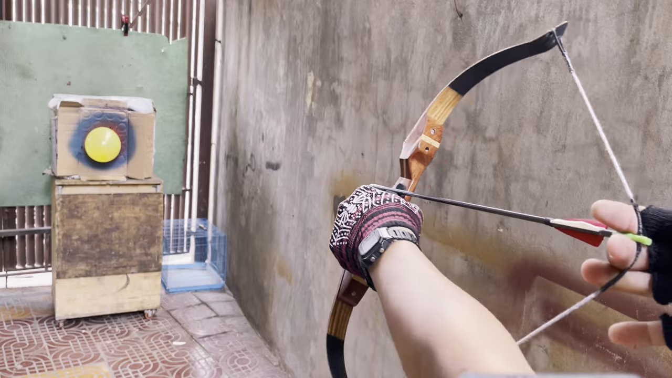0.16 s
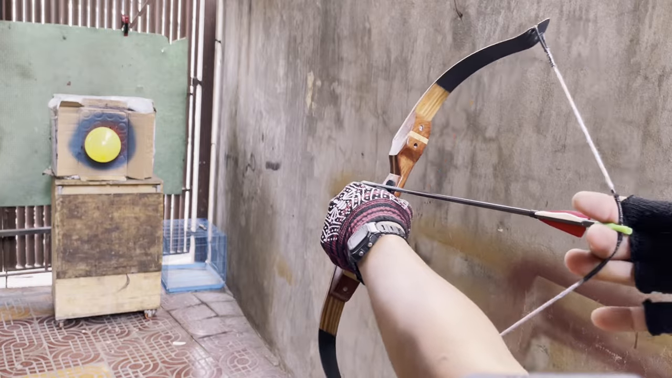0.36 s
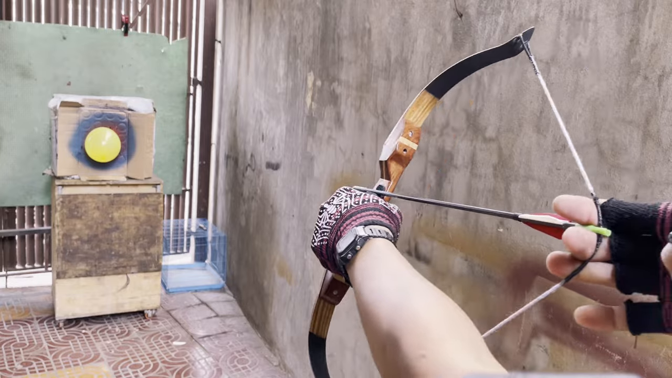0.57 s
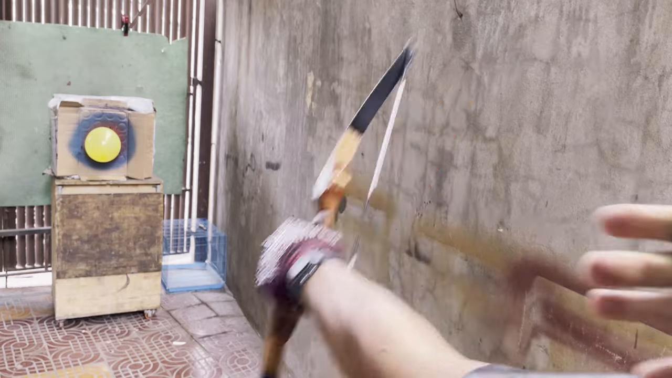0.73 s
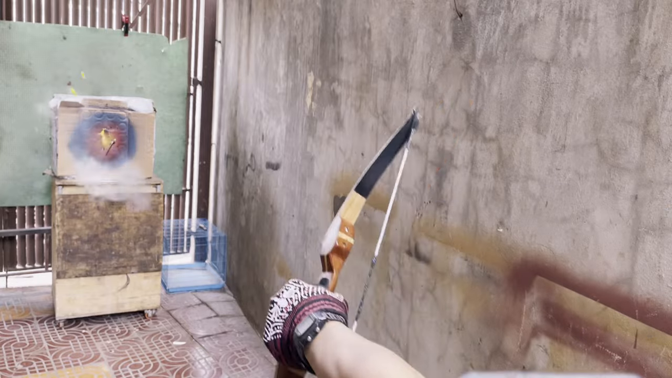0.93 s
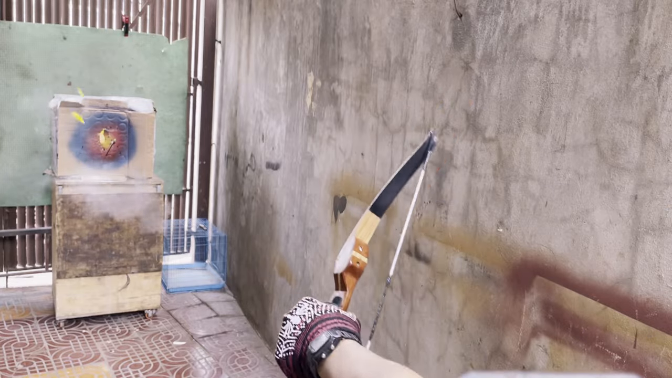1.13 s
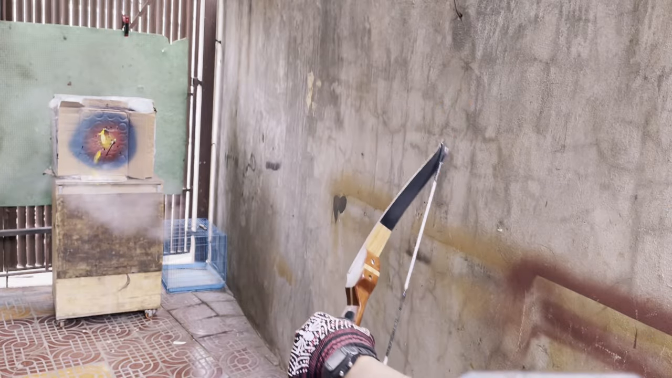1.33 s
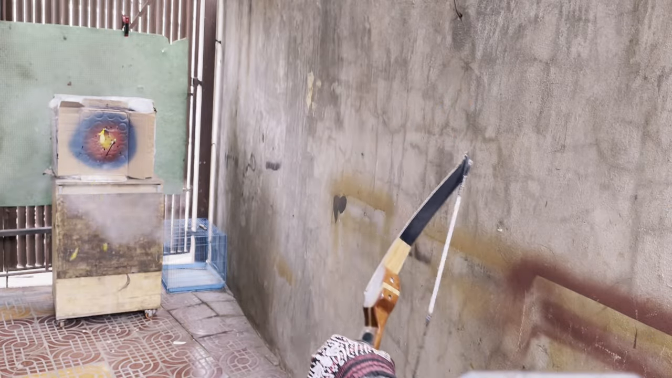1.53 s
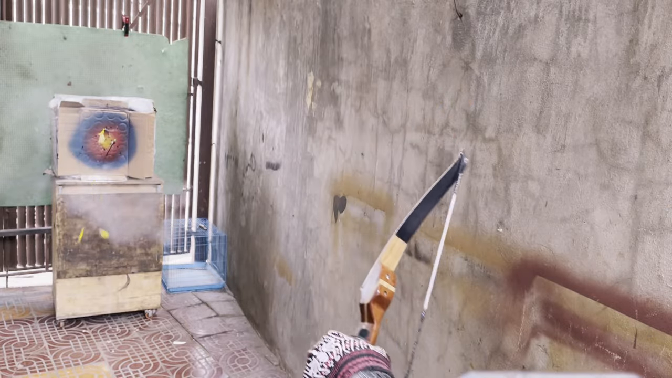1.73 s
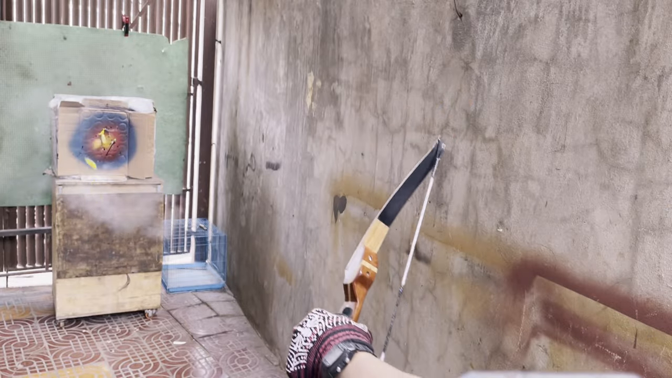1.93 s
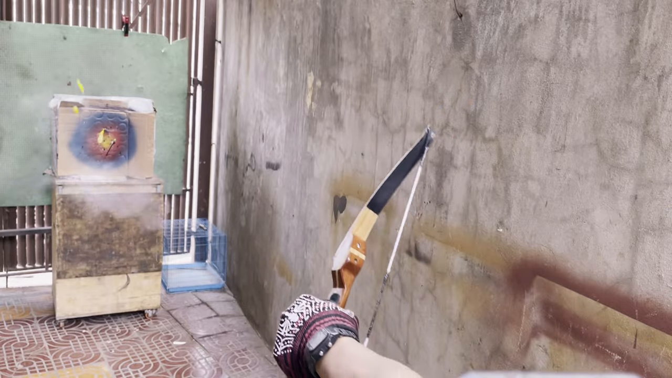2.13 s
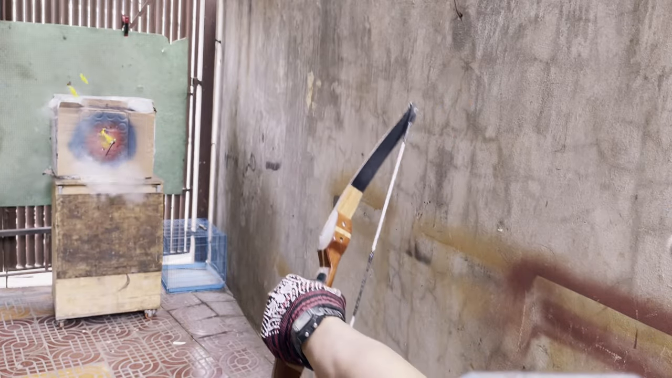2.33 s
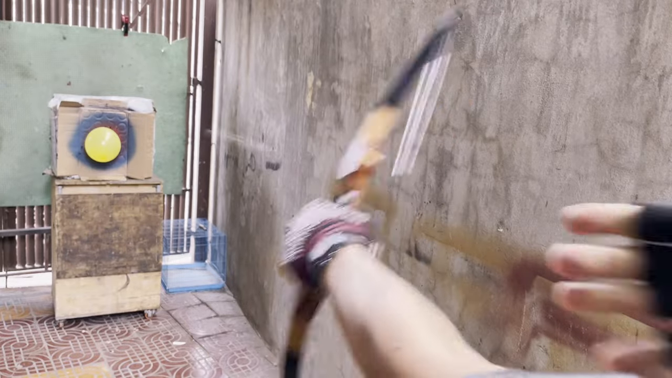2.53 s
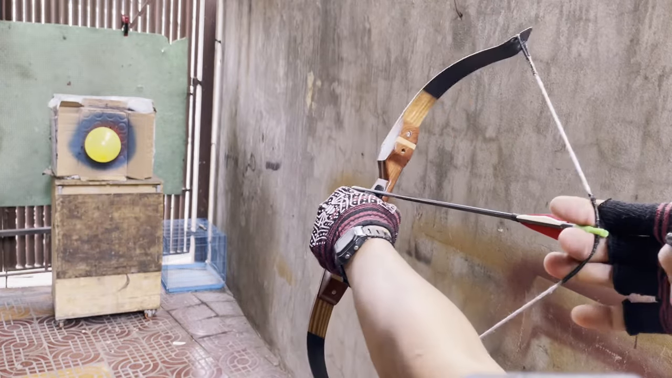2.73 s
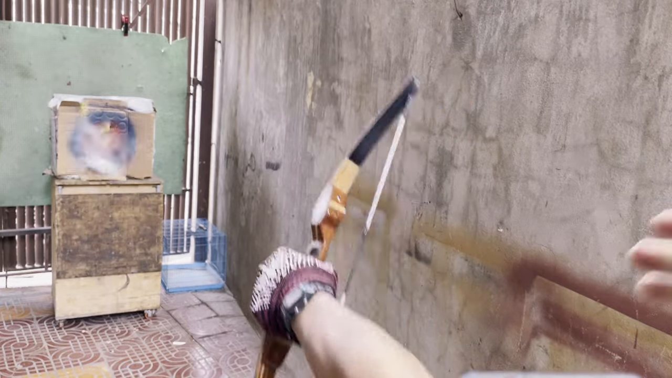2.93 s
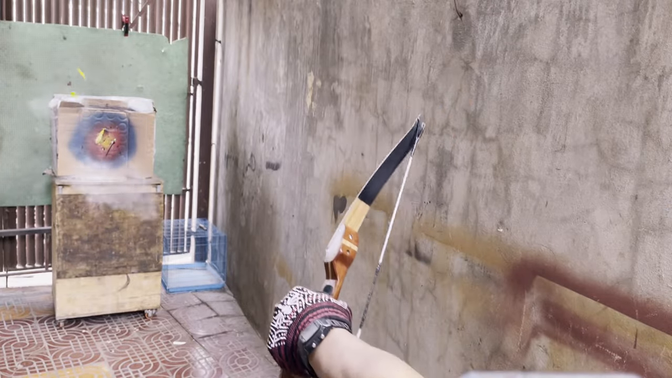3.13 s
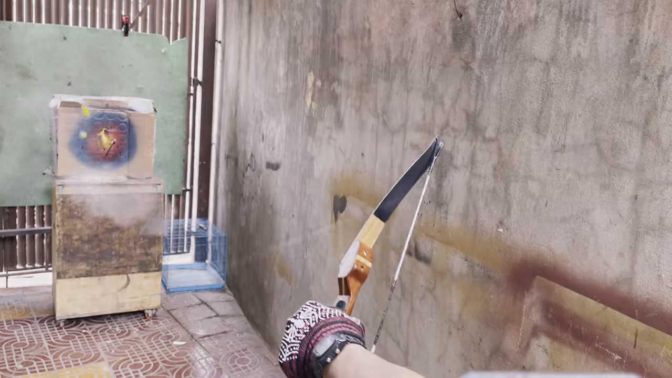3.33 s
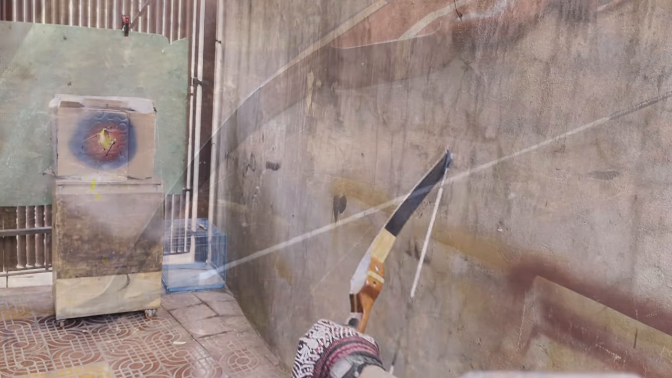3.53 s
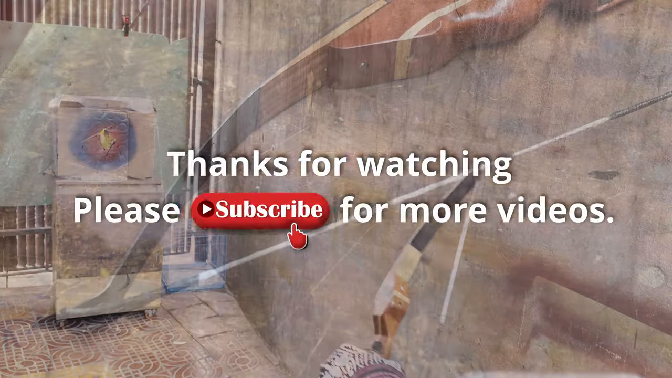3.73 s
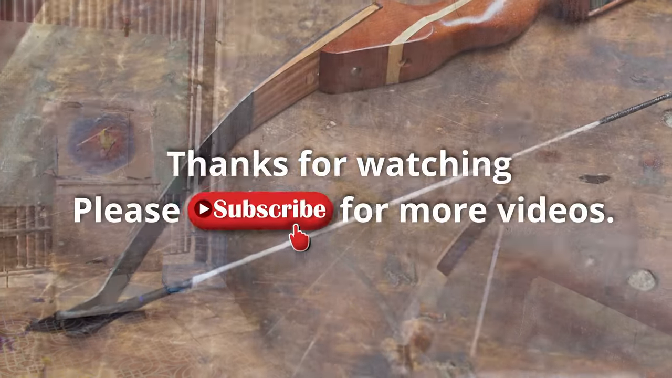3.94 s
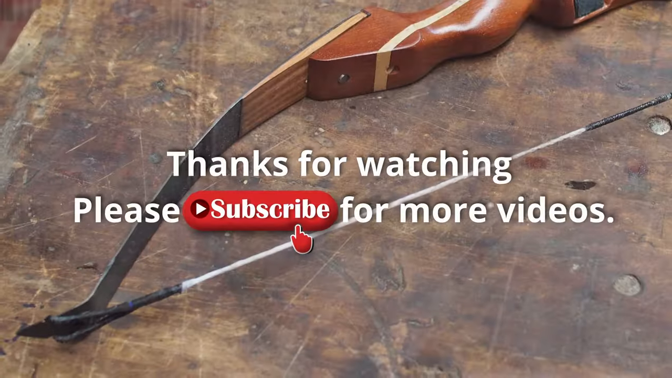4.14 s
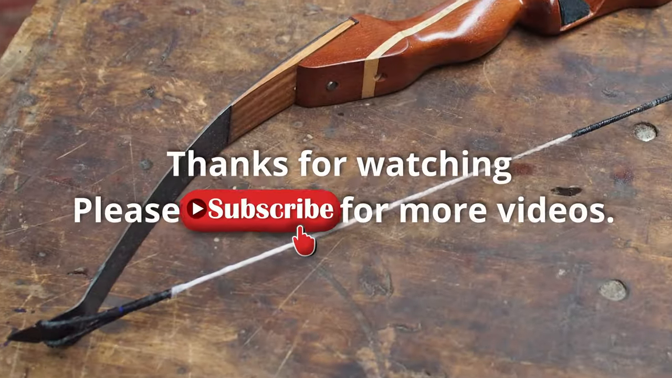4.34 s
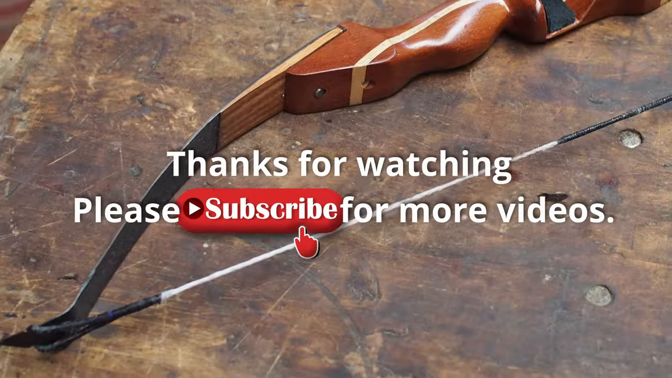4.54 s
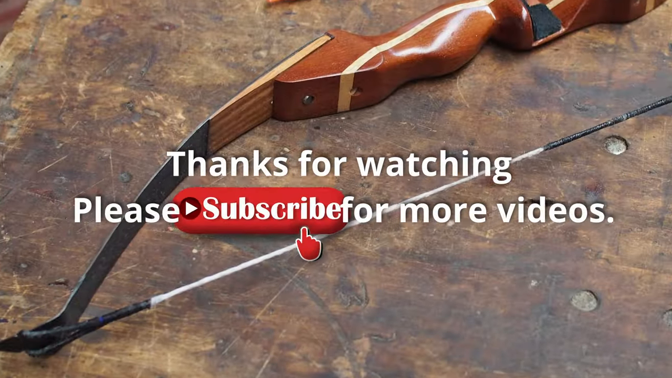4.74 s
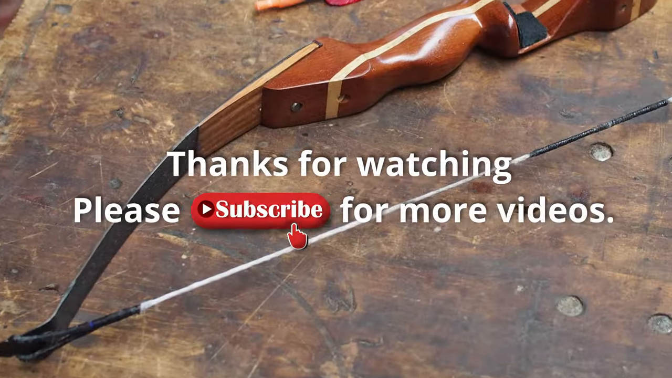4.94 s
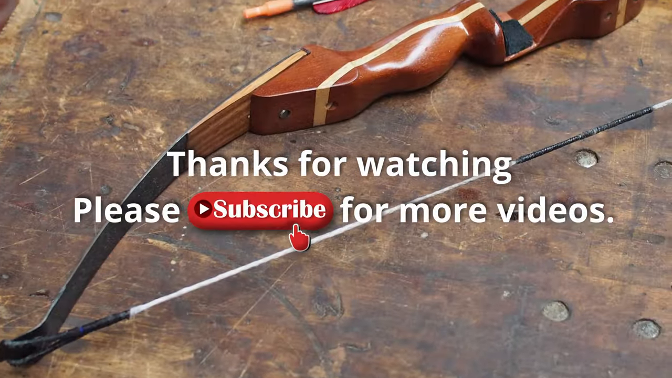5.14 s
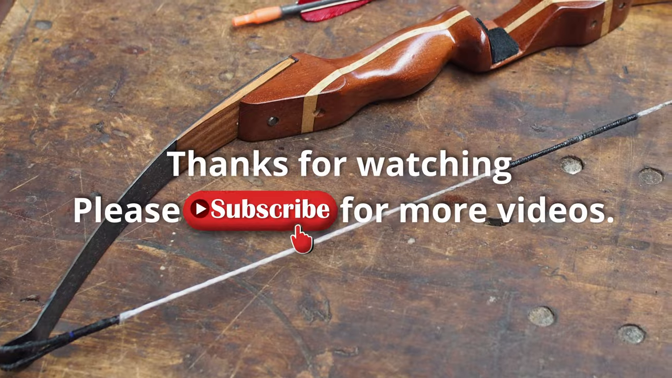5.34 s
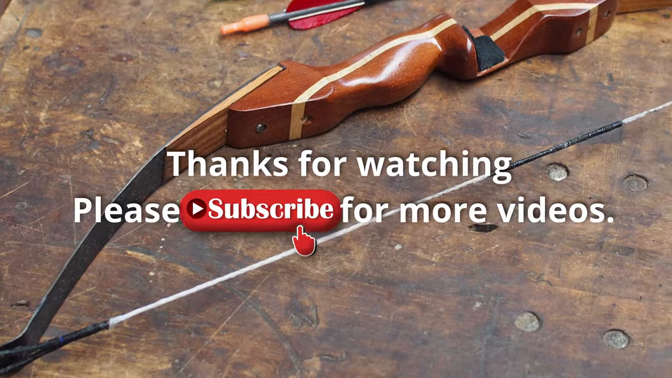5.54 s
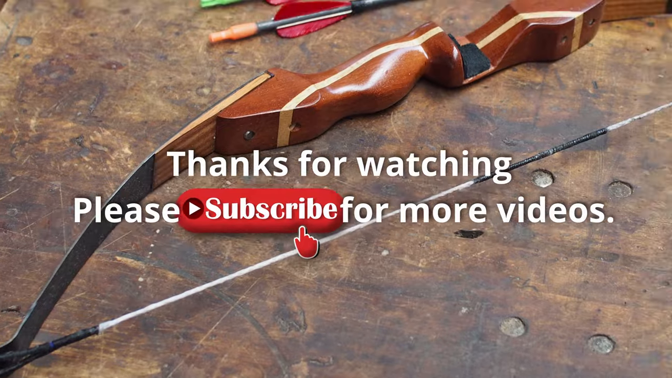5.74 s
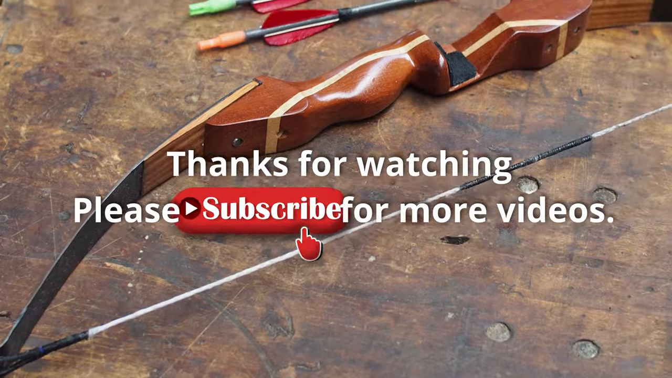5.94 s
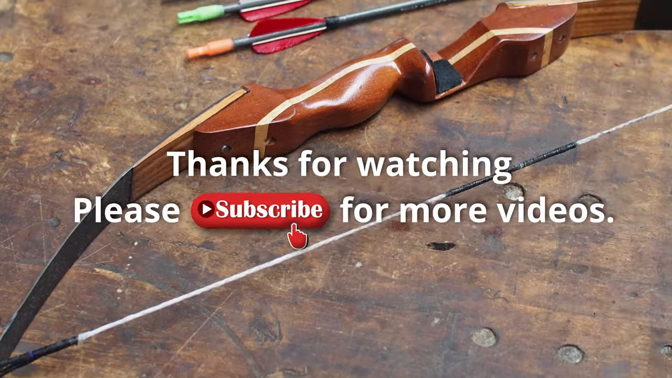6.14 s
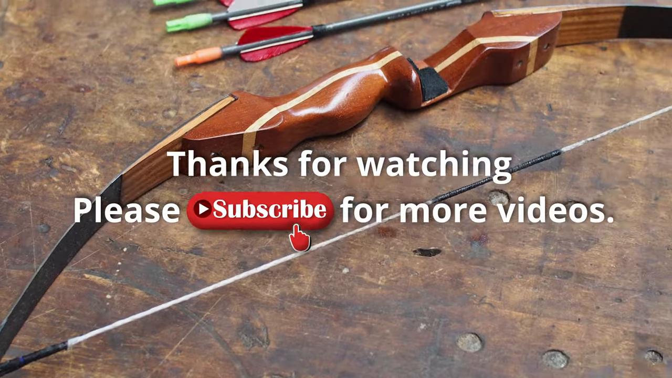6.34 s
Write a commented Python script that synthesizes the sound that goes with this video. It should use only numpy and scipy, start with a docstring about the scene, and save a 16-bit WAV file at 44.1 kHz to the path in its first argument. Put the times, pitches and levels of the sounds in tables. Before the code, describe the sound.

Close in a walled outdoor yard with an engine idling low, a bow string snaps and an arrow hits a tenth of a second later: sharp pop, tearing crack, boxy thud, crackling scraps and a reverberant tail. The sound then runs backwards, swelling into the hit and snap, and the shot repeats forwards. An abrupt cut leaves quiet distant traffic, faint motor tones, light clicks and scuffs.

```python
"""A small recurve bow is shot in a walled yard: string noise bursts and decaying limb and shaft modes,
the arrow's whirr, then the pop and crack of a burst ball and the modal thud of a box.
An engine idles nearby as a sum of harmonics of its firing rate, over coloured-noise air.
The shot plays forwards, backwards and forwards again, then the scene cuts to distant traffic, made of
noise and engine tones, with a few light clicks and scuffs as short noise bursts."""
import sys
import numpy as np
from scipy import signal
from scipy.fft import rfft, irfft, next_fast_len
from scipy.io import wavfile
from scipy.ndimage import uniform_filter1d, minimum_filter1d, map_coordinates

SR = 44100
rng = np.random.default_rng(int(sys.argv[2]) if len(sys.argv) > 2 else 0)


def transcribe(u):
    """Save the signal u as a 16-bit wav file named by the first command-line argument.

    u: samples, shape (n,) or (channels, n), limited to [-1, 1]; the rate is SR.
    q: integer samples, one column per channel.
    """
    v = np.clip(np.atleast_2d(u).T, -1, 1)
    q = np.round(v * 32767).astype(np.int16)
    wavfile.write(sys.argv[1], SR, q)


N = 285768
TIME = np.arange(N) / SR  # seconds
HALF_S = SR // 2  # samples in half a second

# Times at which the shot turns backwards, turns forwards again and yields to the street; the hit.
REWIND_S, REPLAY_S, CUT_S = 1.66862, 2.73636, 3.815
HIT_S = 0.8142

# Stereo likeness of the spread sounds. Each row: frequency in Hz, likeness, limited to -0.9 to 0.995 in use.
WIDE = [(120, 0.82), (400, 0.5), (1200, -0.13), (4000, 0.6), (7200, 0.27), (7700, -1.7), (8900, -1.1),
        (9400, 0.042), (11500, 1), (14500, -1.3)]
# Stereo likeness of the nearer sounds. Each row: frequency in Hz, likeness, limited to -0.9 to 0.995 in use.
NEAR = [(150, 0.99), (450, 0.5), (950, .7), (1900, 0.58), (4000, 0.82), (7000, 0.33), (8300, -1.4),
        (9600, 0.25), (11500, 0.41), (15000, -0.89)]
# Colour difference of the two channels. Each row: frequency in Hz, left minus right in dB.
LEAN = [(100, -1), (300, -1.8), (1200, 1.2), (3500, 2.4), (9000, -.2)]
TOP_HZ = 16600
# Reverberation of the yard. Each row: frequency in Hz, decay time T60 in seconds.
YARD_T60 = [(100, 0.46), (400, 0.81), (2000, 0.52), (6000, 0.44), (14000, 0.33)]

# Air in the yard. Each row: frequency in Hz, relative density in dB per Hz.
YARD_AIR = [(25, -25), (45, -8), (100, -6), (170, -13.5), (250, -12.5), (320, -15.5), (450, -15),
            (750, -17.5), (1050, -17.5), (2000, -24.5), (4000, -32.5), (7000, -36.5), (11000, -43),
            (15000, -50)]
YARD_AIR_DB, OPENING_DB, OPENING_S = -35.5, -5.5, 0.4  # air and engine come up from OPENING_DB at the start
# Firing rate of the idling engine. Each row: time in seconds, mean firings per second.
IDLE = [(0.0, 19.3), (0.8, 19.3), (1.4, 19.15), (3.8, 18.3)]
# Exhaust harmonics. Each row: order of the firing rate, mean level at the start in dB, drift in dB per second.
EXHAUST = [(2, -51, -7.5), (3, -51.5, 8.5), (4, -42, 5), (5, -39, -7), (6, -55, 13.5), (7, -43, -2),
           (9, -53.5, -2.5), (13, -48, -6.5)]
SETTLED_S = 1.156  # the drift of level ends here
LINGER_DB, LINGER_END_S, LINGER_FADE_S = -4, 4.51, 0.31  # the engine after the cut

# Traffic wash. Each row: time in seconds, level in dB, of which only the swing about its mean is used.
STREET_LEVEL = [(3.83, -44.5), (3.94, -46.5), (5.45, -47), (5.85, -50.5), (6.48, -51.5)]
# Rumble of the traffic. Each row: frequency in Hz, relative density in dB per Hz.
TRAFFIC = [(15, -46), (25, -22), (43, -7), (70, -5.5), (91, -2.5), (118, -1), (157, -6.5), (215, -3.5),
           (260, -16), (330, -16.5), (430, -32), (730, -120)]
# Airy wash of the traffic. Each row: frequency in Hz, relative density in dB per Hz.
STREET_AIR = [(100, -7), (250, -3.5), (450, -5), (850, -6), (1400, -13), (2500, -19), (4500, -30),
              (7000, -34.5), (11000, -43.5), (15000, -49)]
RUMBLE_DB, RUMBLE_FOLLOWS, WASH_DB = -40, 0.32, -43.5  # RUMBLE_FOLLOWS: share of the wash's swing
# Engine notes in the street. Each row: start in seconds, end in seconds, mean pitch in Hz, level in dB.
MOTORS = [(4.1, 4.98, 55, -46), (4.72, 5.38, 166, -38.5), (4.74, 6.7, 96.5, -43), (5.05, 6.0, 145.3, -45.5),
          (6.05, 6.7, 195, -48), (5.35, 6.7, 122, -51), (4.07, 4.54, 113, -44), (5.95, 6.7, 43, -50)]
MOTOR_RISE_S, MOTOR_FALL_S = 0.13, 0.16
# Faint far squeals, perhaps brakes. Each row: start in seconds, end in seconds, pitch in Hz, peak level in dB,
# waver in Hz.
SQUEALS = [(5.9, 6.5, 3346, -66, 5), (6.07, 6.26, 1830, -60, 22), (6.09, 6.28, 3250, -65, 25),
           (6.11, 6.2, 1096, -55.5, 6)]

# Scuffs in the street. Each row: time in seconds, level in dB, rise in seconds, T60 in seconds,
# brightness in dB per octave.
STREET_SCUFFS = [(4.76, -43, 0.078, 1.23, -.4), (5.5, -44.5, 0.026, 0.74, 1.1),
                 (6.17, -54.5, 0.065, .8, 0.57)]
# Colour of those scuffs before tilting. Each row: frequency in Hz, relative density in dB per Hz.
SCUFF = [(300, -7), (900, 12), (2500, 1), (5000, -6), (7500, -11), (11000, -20.5), (15000, -28)]
# Soft rustle, probably a sleeve, as the bow arm sinks. Each row: time in seconds, level in dB,
# rise in seconds, T60 in seconds, brightness in dB per octave.
YARD_SCUFFS = [(1.665, -41, 0.19, 0.34, 0)]
# Colour of the rustle. Each row: frequency in Hz, relative density in dB per Hz.
SLEEVE = [(200, -2), (900, 4.5), (2500, -3), (5000, -3.5), (8000, -6), (11000, -12), (15000, -19)]

# Light clicks. Each row: time in seconds, level in dB, lowest Hz, highest Hz, echo in dB relative to the click.
CLICKS = [(4.3725, -37, 4500, 11000, -19), (4.3755, -35.5, 2410, 7000, -14), (5.179, -36, 950, 1430, -19),
          (5.1846, -31.5, 600, 2800, -14), (6.247, -44.5, 9900, 11020, -30), (6.297, -45, 3450, 3800, -20)]
# Modes of a small metal part. Each row: frequency in Hz, relative level in dB, T60 in seconds.
METAL = [(2590, 3, 0.36), (3740, -5, 0.28), (5390, -4.5, 0.36), (6840, -1.5, 0.28), (10340, -9, .22)]
METAL_S, METAL_DB, METAL_WIDTH_HZ = 4.374, -46, 40
# Modes of a small hard piece that is knocked. Each row: frequency in Hz, relative level in dB, T60 in seconds.
KNOCK = [(620, -3, .04), (1250, -9, .03), (1950, -4, .03), (2660, 2.5, 0.029), (2820, -14, 0.18),
         (4600, -16, .025)]
KNOCK_S, KNOCK_DB, KNOCK_ECHO_DB, KNOCK_WIDTH_HZ = 5.1846, -36, -54, 150

# Late answer of the houses beyond the yard. Each row: frequency in Hz, relative density in dB per Hz.
HOUSES = [(100, -25), (260, -5.5), (340, -4), (450, 9.5), (620, 0), (710, 3), (850, -4), (1100, -4),
          (2000, -0.5), (4000, -8.5), (6000, -14), (10000, -47), (15000, -38)]
HOUSES_DB, HOUSES_T60, HOUSES_RISE_S = -30, 1.48, 0.083

# Skin of the ball popping at the first touch. Each row: frequency in Hz, relative density in dB per Hz.
POP = [(500, -24), (2500, -3), (4200, 0), (7000, -2), (10000, -4.5), (15000, -12)]
POP_DB, POP_T60 = -15.5, 0.068
# Arrow tearing through ball and card, then rattling in the box. Each row: seconds after the hit,
# relative level in dB, T60 in seconds.
BLOWS = [(0.0005, -7, 0.025), (0.0022, -5, 0.029), (0.0048, -3, 0.018), (0.0168, -6.5, 0.016),
         (0.032, -14, 0.0082)]
# Colour of the tearing. Each row: frequency in Hz, relative density in dB per Hz.
CRACK = [(60, -27), (300, 7.5), (560, -4.5), (740, 7), (1100, -4.5), (1450, -9.5), (1950, 2.5), (2400, -9),
         (3000, -6.5), (3900, -2.5), (6500, -14.5), (10000, -14.5), (15000, -24)]
# The box takes the blow and rocks back. Each row: seconds after the hit, relative level in dB.
THUDS = [(0.004, -3.5), (0.0162, -15.5)]
# Modes of the box. Each row: frequency in Hz, relative level in dB, T60 in seconds,
# build-up time constant in seconds.
BOX = [(106.5, 2, 0.044, 0.0046), (145, 2, 0.042, 0.004), (187.3, -4, 0.078, 0.0038),
       (234, -4.5, 0.078, 0.0055), (286, -13, 0.16, 0.012), (381.3, -11, 0.14, 0.003), (408, -19, .3, .004),
       (455, -21, .6, .01), (513, -14, 0.16, 0.0018), (742, -9, 0.037, 0.0027), (686, -17.5, 0.33, 0.0077),
       (736, -16.5, .32, .004), (963, -12, 0.033, 0.0036), (1432, -29, 0.4, 0.0036)]
# Modes of the arrow quivering in the box. Each row: frequency in Hz, relative level in dB, T60 in seconds.
QUIVER = [(1893, 3.5, 0.34), (2620, -2, .28), (3640, -9, 0.28), (4430, -7, 0.37)]
QUIVER_DB, QUIVER_WIDTH_HZ = -27, 45
# Crackle of the ball's scraps. Each row: frequency in Hz, relative density in dB per Hz.
DEBRIS = [(400, -20), (1200, -4), (2500, 0), (4000, -5), (6200, 6), (8300, -21), (10000, 0), (13000, -6),
          (15000, -33)]
DEBRIS_DB, DEBRIS_T60, DEBRIS_PER_S, DEBRIS_CLUMP_DB = -22, 0.3, 450, 3  # mean number of grains per second
# Answer of the yard to the hit. Each row: frequency in Hz, relative density in dB per Hz.
BOX_ECHO = [(30, -37), (70, -33), (140, -1.5), (260, -4.5), (440, 0), (540, -3.5), (610, -8), (720, -5),
            (850, -10), (1300, -11), (1900, -5.5), (3000, -11), (5500, -14), (8500, -20.5), (15000, -30)]

# Whirr of the vanes in flight. Each row: frequency in Hz, relative density in dB per Hz.
WHIRR = [(300, -43), (780, -25), (920, 3), (1100, -26), (1450, -14), (1610, -1), (1820, -7), (1950, -15),
         (2750, -10), (3200, -22), (12000, -34)]
# Short noise swell just before the hit. Each row: frequency in Hz, relative density in dB per Hz.
SWELL = [(150, -9), (450, -2), (1000, -6), (2200, 1), (3800, -3), (7000, -14), (12000, -33)]
SWELL_DB, SWELL_RISE_S = -24.5, .006

# Snaps of the string, in quick succession. Each row: time in seconds, relative level in dB, T60 in seconds.
SNAPS = [(0.7045, -14, 0.009), (0.7075, -14.5, 0.016), (0.7147, -30, .008)]
SNAP_S = SNAPS[0][0]
# String brushing the fingers. Each row: frequency in Hz, relative density in dB per Hz.
SLIP = [(60, -20), (300, 2.5), (1000, -12), (2500, -13), (6000, -20.5), (14000, -25)]
# Colour of the snaps. Each row: frequency in Hz, relative density in dB per Hz.
SNAP = [(60, -5), (150, -12.5), (330, 9), (600, -14), (1000, -6.5), (2200, -3), (3000, 0), (4200, -2.5),
        (6000, -3.5), (9500, -8), (15000, -9)]
# Modes of the limbs, plucked by the freed string. Each row: frequency in Hz, relative level in dB, T60 in seconds.
LIMBS = [(230, -0.5, 0.049), (475, -2.5, .02), (916, -1.5, 0.034)]
LIMBS_S, LIMBS_DB = .6965, -24.5
# Modes of the arrow shaft. Each row: settled frequency in Hz, relative level in dB, T60 in seconds.
SHAFT = [(1670, 2.5, 0.3), (1605, -4, .3), (1830, -10, .6), (945, -11, .6)]
FLUTTER_DB, SHAFT_FLAT = 2.5, .08  # depth of the level flutter; share by which the pitch starts low
# Upper partials of the arrow shaft, as narrow noise bands. Each row: frequency in Hz, relative level in dB,
# T60 in seconds.
UPPER_SHAFT = [(2620, -1.5, .28), (2880, -1.5, .22), (3900, -11, 0.14), (4570, -13.5, 0.097),
               (6190, -7, .13)]
UPPER_SHAFT_DB, UPPER_SHAFT_WIDTH_HZ = -31.5, 190
HOLD_S = .19  # the gain stays low this long after a loud blow


def amp(db):
    """Decibel law: level to amplitude ratio."""
    return 10 ** (np.asarray(db) / 20)


def unit(x):
    """Normalisation to a root mean square of 1."""
    return x / np.sqrt(np.mean(x ** 2) + 1e-20)


def along(points, hz):
    """Linear interpolation of (Hz, value) points on a logarithmic frequency axis."""
    f, v = np.transpose(points)
    return np.interp(np.log(hz + 1), np.log(f + 1), v)


def curves(rows):
    """Linear interpolation in time: one curve for each column after the time."""
    s, *columns = np.transpose(rows)
    return [np.interp(TIME, s, column) for column in columns]


def wobble(rate):
    """Slow random modulation: a smooth spline through random knots, rate knots a second."""
    return map_coordinates(rng.standard_normal(256), [TIME * rate], mode="wrap")


def filtered(x, response):
    """Linear filtering: the spectrum of x is multiplied by a function of frequency."""
    n = x.shape[-1]
    padded = next_fast_len(n + 8192)
    hz = np.fft.rfftfreq(padded, 1 / SR)
    return irfft(rfft(x, padded) * response(hz), padded)[..., :n]


def noise(spectrum, alike, size=N):
    """Partial coherence: the ratio of mid to side noise sets the left-right likeness; rms 1."""
    def mid_side(hz):
        angle = np.arccos(np.clip(along(alike, hz), -.9, .995)) / 2
        return amp(along(spectrum, hz)) * [np.cos(angle), np.sin(angle)]

    mid, side = filtered(rng.standard_normal((2, size)), mid_side)
    return unit(np.array([mid + side, mid - side]))


def fade(t60, attack=0.0002):
    """Exponential decay after a quick build-up, over half a second."""
    t = TIME[:HALF_S]
    return amp(-60 * t / t60) * (1 - np.exp(-t / attack))


def ring(modes, flat=0, settle=0.0289):
    """Modal superposition: damped sines start together, and may glide up from flat by a given share."""
    t = TIME[:HALF_S]
    clock = t - flat * settle * (1 - np.exp(-t / settle))
    out = np.zeros(HALF_S)
    for hz, db, t60, *build_up in modes:
        level = amp(db + .5 * rng.normal())
        out += level * fade(t60, *build_up) * np.sin(2 * np.pi * hz * clock)
    return out


def scattered(modes, width_hz, attack):
    """Narrow-band noise: each mode is a decaying band whose level flutters at random."""
    out = np.zeros((2, HALF_S))
    for hz, db, t60 in modes:
        half = min(width_hz, hz / 8)
        band = [(hz / 2, -80), (hz * .8, -45), (hz - half, -14), (hz, 0),
                (hz + half, -14), (hz * 1.25, -45), (hz * 2, -80)]
        out += amp(db) * fade(t60, attack) * noise(band, WIDE, size=HALF_S)
    return out


def echo(spectrum, far_db, far_t60):
    """Two-slope reverberation: near walls die fast, the houses beyond leave a faint longer tail."""
    hz, t, z = signal.stft(noise(spectrum, WIDE, size=SR), SR, nperseg=256)
    near = amp(-60 * t / along(YARD_T60, hz)[:, None])
    far = amp(far_db - 60 * t / far_t60)
    tail = signal.istft(z * (near + far), SR, nperseg=256)[1][:, :SR]
    return tail * np.clip((TIME[:SR] - .003) / 0.0095, 0, 1)  # the first reflection needs a moment to return


def patchy(x, depth_db):
    """Random modulation in time and frequency: narrow patches swell and sink on their own."""
    z = signal.stft(x, nperseg=2048)[2]
    field = uniform_filter1d(rng.standard_normal(z.shape[1:]), size=3, axis=0)
    field = uniform_filter1d(field, size=6, axis=1)
    return unit(signal.istft(z * amp(depth_db * unit(field)), nperseg=2048)[1][:, :N])


def add(track, s, sound):
    """Superposition: a sound is mixed into the track at time s."""
    part = track[:, round(s * SR):][:, :sound.shape[-1]]
    part += sound[..., :part.shape[1]]


def engine():
    """Harmonic series: orders of the firing rate leave the exhaust, drifting at first and wavering."""
    rate, = curves(IDLE)
    turns = np.cumsum(rate * (1 + 0.0043 * wobble(7.37))) / SR
    settling_s = np.minimum(TIME, SETTLED_S)
    out = np.zeros(N)
    for order, db, db_per_s in EXHAUST:
        level_db = db + db_per_s * settling_s + 1.7 * wobble(3.72)
        out += amp(level_db) * np.sqrt(2) * np.sin(2 * np.pi * (order * turns + rng.random()))
    return out


def motors():
    """Frequency modulation: slightly unsteady engine tones come up, hold and drop away."""
    out = np.zeros(N)
    for start, end, hz, db in MOTORS:
        present = np.clip(np.minimum((TIME - start) / MOTOR_RISE_S, (end - TIME) / MOTOR_FALL_S), 0, 1)
        turns = np.cumsum(hz * (1 + 0.0029 * wobble(9))) / SR + rng.random()
        out += amp(db + 0.81 * wobble(5.3)) * present * np.sqrt(2) * np.sin(2 * np.pi * turns)
    return out


def squeals():
    """Wavering sinusoids: thin tones swell and fade far down the street."""
    out = np.zeros(N)
    for start, end, hz, db, waver_hz in SQUEALS:
        swell = np.sin(np.pi * np.clip((TIME - start) / (end - start), 0, 1))
        turns = np.cumsum(hz + waver_hz * wobble(60)) / SR
        out += amp(db + 2 * wobble(16)) * swell * np.sin(2 * np.pi * turns)
    return out


def scuffs(rows, colour):
    """Friction noise: gritty swishes swell and die away, with a spectral tilt for brightness."""
    out = np.zeros((2, N))
    for s, db, rise, t60, tilt_db in rows:
        before, after = np.minimum(TIME - s, 0), np.maximum(TIME - s, 0)
        swell = np.exp(-(before / rise) ** 2) * amp(-60 * after / t60)
        tilted = [(hz, level + tilt_db * np.log2(hz / colour[0][0])) for hz, level in colour]
        out += amp(db + 1.3 * wobble(110)) * swell * noise(tilted, WIDE)
    return out


def clicks():
    """Impact excitation: small hard things are set down in band-limited bursts; metal rings, a piece knocks."""
    out = np.zeros((2, N))
    for s, db, low_hz, high_hz, echo_db in CLICKS:
        band = [(low_hz / 4, -36), (low_hz, 0), (high_hz, -3), (high_hz * 1.47, -20), (high_hz * 4, -36)]
        add(out, s, amp(db) * fade(0.015) * noise(band, NEAR, size=HALF_S))
        add(out, s, amp(db + echo_db) * echo(band, far_db=-28, far_t60=0.48))
    add(out, METAL_S, amp(METAL_DB) * scattered(METAL, METAL_WIDTH_HZ, attack=.001))
    add(out, KNOCK_S, amp(KNOCK_DB) * ring(KNOCK))
    lingering = [(hz, db, .3) for hz, db, _ in KNOCK]  # every mode lingers on with the same T60
    add(out, KNOCK_S, amp(KNOCK_ECHO_DB) * scattered(lingering, KNOCK_WIDTH_HZ, attack=.008))
    return out


def street():
    """Common modulation: one level drives the rumble and airy wash of traffic; smaller sources are added."""
    level_db, = curves(STREET_LEVEL)
    swing_db = level_db - level_db[TIME > CUT_S].mean()
    rumble = amp(RUMBLE_DB + RUMBLE_FOLLOWS * swing_db) * noise(TRAFFIC, WIDE)
    air = amp(WASH_DB + swing_db + 0.28 * wobble(7.3)) * patchy(noise(STREET_AIR, WIDE), depth_db=2.5)
    lingering = np.clip((LINGER_END_S - TIME) / LINGER_FADE_S, 0, 1)
    idling = amp(LINGER_DB) * lingering * engine()
    return rumble + air + idling + motors() + squeals() + scuffs(STREET_SCUFFS, SCUFF) + clicks()


def houses():
    """Late reverberation: a soft wash builds up after the hit and decays exponentially."""
    t = np.maximum(TIME - HIT_S, 0)
    build_up = 1 - np.exp(-t / HOUSES_RISE_S)
    return amp(HOUSES_DB - 60 * t / HOUSES_T60) * build_up * noise(HOUSES, WIDE)


def debris():
    """Random impulse train: scraps and powder spray against the card in a dense, dying crackle."""
    landing = rng.random(HALF_S) < DEBRIS_PER_S / SR
    grains = landing * rng.standard_normal((2, HALF_S))
    crackle = unit(filtered(grains, lambda hz: amp(along(DEBRIS, hz))))
    flurries = amp(DEBRIS_CLUMP_DB * wobble(140)[:HALF_S])
    return amp(DEBRIS_DB) * fade(DEBRIS_T60, 0.0043) * unit(flurries * crackle)


def target():
    """Rupture and modal impact: the ball pops and tears, the box thuds, scraps fly and the yard answers."""
    out = np.zeros((2, N))
    add(out, HIT_S, amp(POP_DB) * fade(POP_T60) * noise(POP, NEAR, size=HALF_S))
    for delay, db, t60 in BLOWS:
        add(out, HIT_S + delay, amp(db + 3.5) * fade(t60, 0.0015) * noise(CRACK, NEAR, size=HALF_S))
    for delay, db in THUDS:
        add(out, HIT_S + delay, -amp(db + 0.5) * ring(BOX))
    add(out, HIT_S, amp(QUIVER_DB) * scattered(QUIVER, QUIVER_WIDTH_HZ, attack=0.0018))
    add(out, HIT_S, debris())
    grain = amp(wobble(254)[:SR])  # random grain in the level of the tail
    add(out, HIT_S, amp(-18.0) * grain * echo(BOX_ECHO, far_db=-9.5, far_t60=1.18))
    return out


def flight():
    """Flow noise: the vanes whirr from release until the arrow stops; a short noise swell precedes the hit."""
    flying = np.clip(np.minimum(TIME - SNAP_S, HIT_S + 0.018 - TIME) / 0.003, 0, 1)
    rising = np.exp(np.minimum(TIME - HIT_S, 0) / SWELL_RISE_S)
    whirr = amp(-43.5) * noise(WHIRR, NEAR)
    swell = amp(SWELL_DB) * rising * noise(SWELL, NEAR)
    return flying * (whirr + swell)


def bow():
    """Release of stored energy: the string brushes the fingers and snaps home, leaving the shaft ringing."""
    out = np.zeros((2, N))
    add(out, .691, amp(-24.5) * fade(0.068, 0.0012) * noise(SLIP, NEAR, size=HALF_S))
    add(out, LIMBS_S, amp(LIMBS_DB) * ring(LIMBS))
    for s, db, t60 in SNAPS:
        add(out, s, amp(db + 4.5) * fade(t60, 0.00045) * noise(SNAP, NEAR, size=HALF_S))
    flutter = amp(FLUTTER_DB * wobble(90)[:HALF_S])  # random level flutter of the ringing
    add(out, SNAP_S, amp(-28.5) * flutter * ring(SHAFT, flat=SHAFT_FLAT))
    add(out, SNAP_S, amp(UPPER_SHAFT_DB) * scattered(UPPER_SHAFT, UPPER_SHAFT_WIDTH_HZ, attack=.001))
    add(out, SNAP_S, amp(-35.0) * echo(SNAP, far_db=-27.5, far_t60=0.45))
    return out


def gain_control(x, limit_db, hold, release):
    """Dynamic compression: a loud blow turns the gain down at once; it stays low, then creeps back."""
    power = uniform_filter1d(np.mean(x ** 2, axis=0), SR // 200)
    level_db = 10 * np.log10(np.abs(power) + 1e-12)
    needed_db = np.minimum(limit_db - level_db, 0)
    held, slow = int(hold * SR) | 1, int(release * SR) | 1  # odd window lengths in samples
    held_db = minimum_filter1d(needed_db, held, origin=held // 2)  # looks back in time
    eased_db = np.minimum(held_db, uniform_filter1d(held_db, slow, origin=slow // 2))
    return x * amp(uniform_filter1d(eased_db, size=128))


def yard():
    """Superposition under one gain control: a single shot over the idling engine and the outdoor air."""
    air = amp(YARD_AIR_DB + 0.98 * wobble(6.3)) * patchy(noise(YARD_AIR, WIDE), depth_db=2.5)
    opening = amp(OPENING_DB * np.maximum(1 - TIME / OPENING_S, 0))
    background = opening * (engine() + air)
    live = bow() + flight() + target() + houses() + background + scuffs(YARD_SCUFFS, SLEEVE)
    return gain_control(live, limit_db=-10, hold=HOLD_S, release=0.1)


def scene():
    """Time reversal: the shot runs forwards, backwards and forwards again, then gives way to the street."""
    direction = np.where((TIME >= REWIND_S) & (TIME < REPLAY_S), -1, 1)
    shots = yard()[:, np.cumsum(direction) - 1]
    return np.where(TIME < CUT_S, shots, street())


def record(dry):
    """Band limiting and saturation: the channels differ in colour, peaks are rounded, extremes are cut."""
    pair = filtered(dry, lambda hz: amp(np.outer([1, -1], along(LEAN, hz)) / 2))
    pair = signal.sosfilt(signal.butter(2, 36, "high", fs=SR, output="sos"), pair)
    rounded = pair / (1 + np.abs(pair / .9) ** 6) ** (1 / 6)
    return filtered(rounded, lambda hz: hz < TOP_HZ)


dry = scene()
out = record(dry)
transcribe(out)
```